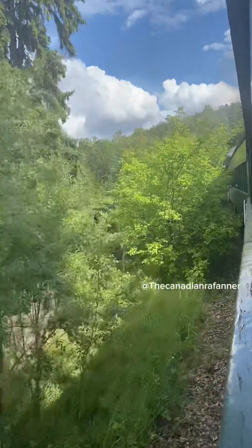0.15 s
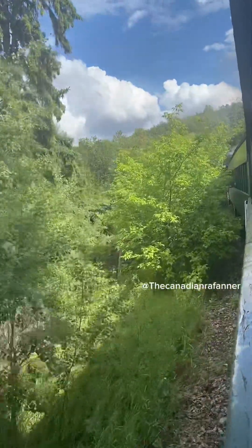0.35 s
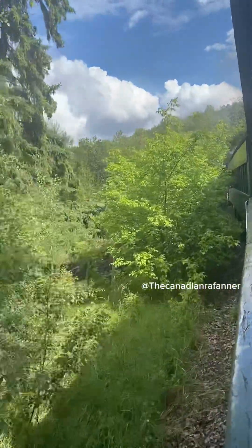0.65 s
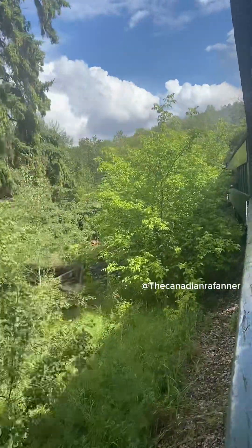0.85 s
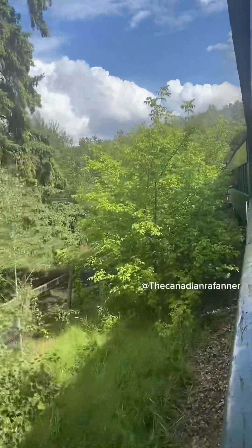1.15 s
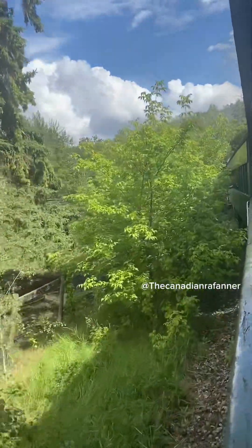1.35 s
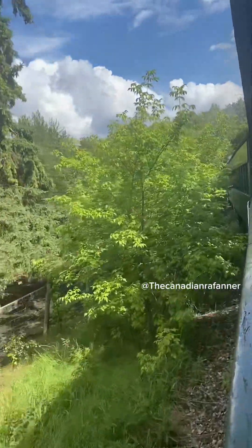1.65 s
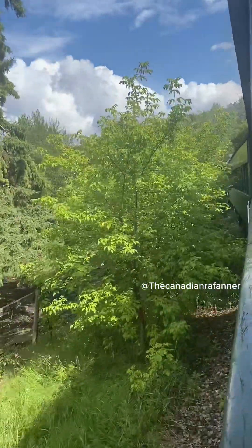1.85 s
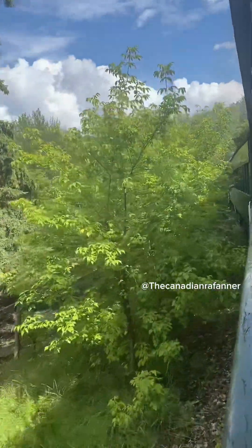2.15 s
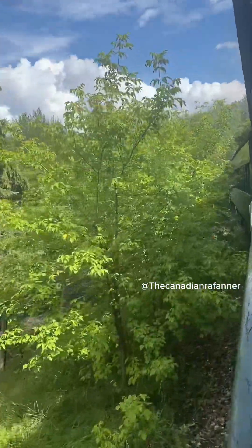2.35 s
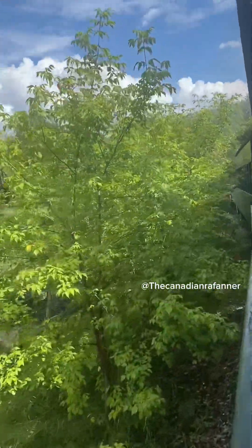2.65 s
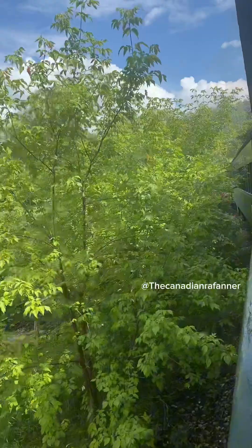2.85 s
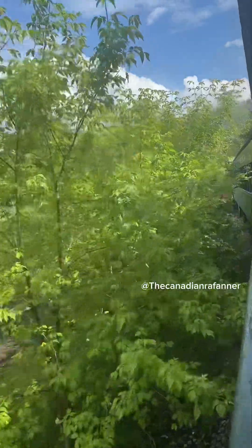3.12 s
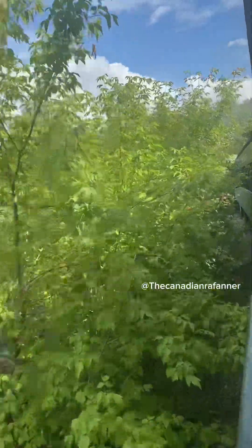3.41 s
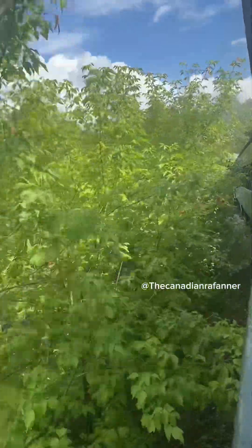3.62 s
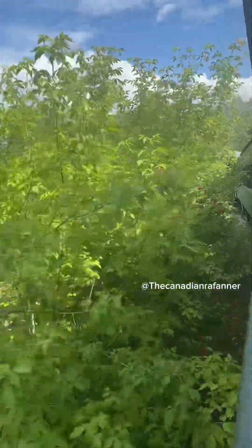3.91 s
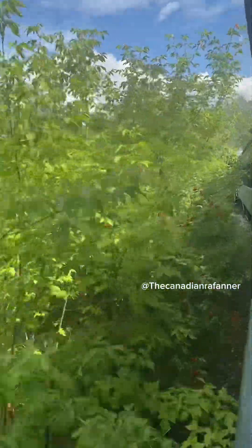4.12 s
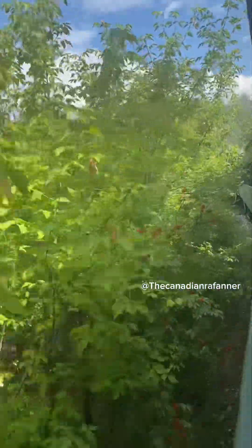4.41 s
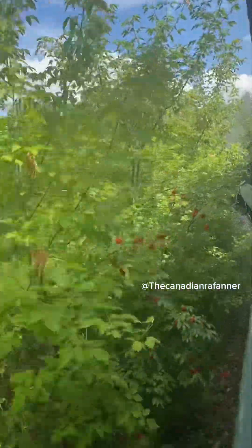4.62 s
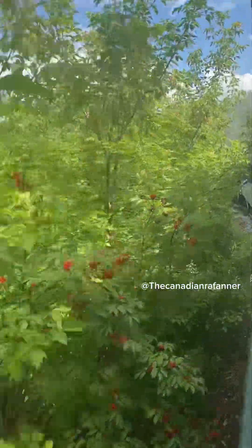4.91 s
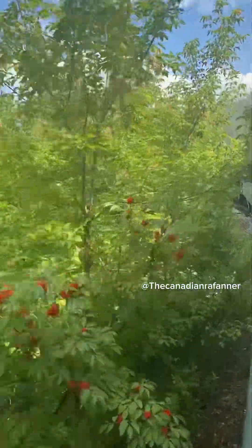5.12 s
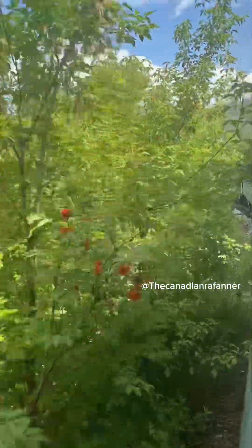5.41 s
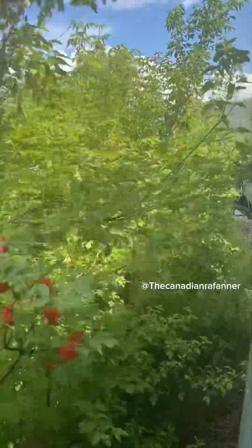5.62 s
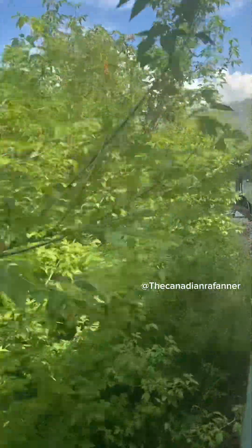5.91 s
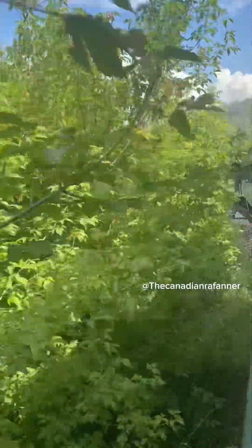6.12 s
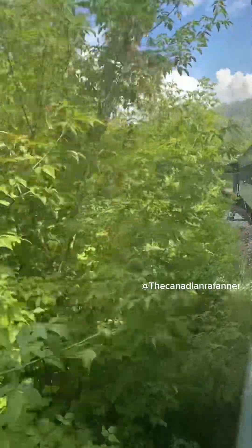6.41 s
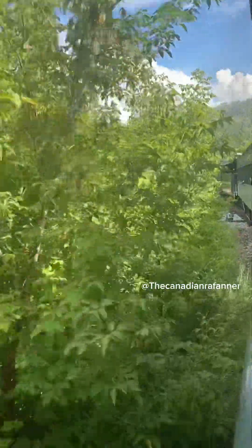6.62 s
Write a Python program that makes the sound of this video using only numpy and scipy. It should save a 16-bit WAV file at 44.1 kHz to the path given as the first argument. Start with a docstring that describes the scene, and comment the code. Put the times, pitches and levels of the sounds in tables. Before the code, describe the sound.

A steam engine puffs about three times a second ahead of a rolling carriage, over low booms, wheel grinding, joint knocks and brief squeals.

```python
"""A jolt booms through the carriage body, and at once a steam engine ahead puffs, three times a second.
Heard from an open carriage window: the puffs are bands of noise that swell fast and die, with echoes off trees.
Below, shaken body modes boom, coloured noise rolls with the wheels and damped low tones thud.
On a curve the flanges grind as patchy noise through wheel modes, with gliding noise squeals and purer squeaks.
Joints and couplings knock as chords of damped tones; a faint ringing rail and a thin hiss lie behind it all."""
import sys
import numpy as np
from scipy import signal
from scipy.fft import rfft, irfft
from scipy.io import wavfile
from scipy.ndimage import uniform_filter1d

SR = 44100
rng = np.random.default_rng(int(sys.argv[2]) if len(sys.argv) > 2 else 0)


def wav_record(signal):
    """Record a signal, one row per channel, as 16-bit PCM in the file named by sys.argv[1]."""
    frames = np.transpose(np.atleast_2d(signal))
    bounded = np.clip(frames, -1, 1)
    # unit amplitude maps onto the largest positive 16-bit level
    quanta = np.round(bounded * 32767).astype(np.int16)
    wavfile.write(sys.argv[1], SR, quanta)


N = 298116
T = np.arange(N) / SR  # time of each sample [s]
HZ = np.fft.rfftfreq(N, 1 / SR)  # frequency of each spectrum bin [Hz]


def amp(db):
    """Decibels to gain."""
    return 10 ** (np.asarray(db) / 20)


def evened(x):
    """Scales to rms 1."""
    return x / np.sqrt(np.mean(x ** 2) + 1e-20)


def read(f, value):
    """Reads a curve over frequency at every bin, joined on a log frequency axis."""
    return np.interp(np.log(HZ + 1), np.log(np.add(f, 1)), value)


def colour_gain(rows):
    """Turns a table of (frequency [Hz], density [dB per Hz]) into a gain for each bin."""
    return amp(read(*np.transpose(rows)))


def curves(rows):
    """Joins each level column of a (time [s], level [dB], ...) table over every sample."""
    s, *columns = np.transpose(rows)
    return [np.interp(T, s, column) for column in columns]


def smoothed_twice(x, size):
    """Two running means in a row leave only slow drift."""
    return uniform_filter1d(uniform_filter1d(x, size=size), size=size)


def noise(gain, patchy_db=None):
    """Two unrelated noises of one colour; patches of level drifting over time and pitch are shared by both."""
    x = irfft(rfft(rng.standard_normal((2, N))) * gain, N)
    if patchy_db is None:
        return evened(x)
    z = signal.stft(x, nperseg=512)[2]
    patches = rng.standard_normal(z.shape[:0:-1]).T
    patches = uniform_filter1d(patches, size=5, axis=0)  # across pitch
    patches = evened(uniform_filter1d(patches, size=8, axis=1))  # across time
    patchy = signal.istft(z * amp(patchy_db * patches), nperseg=512)[1]
    return evened(patchy[:, :N])


def peak(hz, width):
    """Gain of one steep resonance."""
    return 1 / (1 + ((HZ - hz) / (0.83 * width)) ** 2)


def hump(s, wide):
    """A smooth swell of power centred on s seconds, `wide` seconds between its 1/e points."""
    return np.exp(-((T - s) / (wide / 2)) ** 2)


def grain(depth_db, count, size):
    """A gain that jumps about, each clump lasting some `size` samples."""
    drift = evened(smoothed_twice(rng.standard_normal(count), size))
    return evened(amp(depth_db * np.clip(drift, -2.5, 2.5)))


SLIP_GRAIN_DB = 0.7  # unevenness of rubbing, also used in the short bursts


def band(hz, end_hz, width, length, skew=1.):
    """A grainy burst of noise in one gliding resonance; a skew below 1 brings its crest forward."""
    u = np.linspace(0, 1, int(length * SR))
    a, b = rng.standard_normal((2, 2, 20000))
    lowpass = signal.butter(2, width / 2, fs=SR, output="sos")
    slow = signal.sosfilt(lowpass, a + 1j * b)[:, -len(u):]  # past the filter's start
    glide = np.exp(2j * np.pi * np.cumsum(hz + (end_hz - hz) * u) / SR)
    x = (slow * glide).real
    x = evened(x * grain(SLIP_GRAIN_DB, count=20000, size=250)[:len(u)])
    return x * np.sin(np.pi * u ** skew) ** 0.69


def add(mix, s, sound):
    """Mixes a sound in at s seconds, cut off at the end of the mix."""
    part = mix[:, round(s * SR):][:, :sound.shape[1]]
    part += sound[:, :part.shape[1]]


# Thin hiss high above the wheels in pitch: (time [s], level [dB])
HISS_LEVEL = [(0, -49.5), (.4, -64), (1.04, -53.5), (1.5, -73), (1.92, -55), (2.45, -65), (2.96, -57),
              (3.5, -58.5), (4.3, -59.5), (4.45, -77), (4.7, -53.5), (5.35, -53), (5.9, -56.5), (6.23, -52),
              (6.48, -57.5), (6.76, -53)]
# Hiss colour: (frequency [Hz], relative density [dB per Hz])
HISS_COLOUR = [(4000, -12.5), (6000, 7.5), (8500, -0.5), (11000, -14.5), (13000, 3), (15000, -3)]


def hiss():
    """Smooth treble noise that swells and sinks slowly."""
    level_db, = curves(HISS_LEVEL)
    return amp(level_db) * noise(colour_gain(HISS_COLOUR), patchy_db=3.5)


TUG_DELAY_S = 0.042  # each piston stroke tugs the train just after its puff
RAIL_DB, RING_HALF_WIDTH_S = -44, 0.035  # steady ring; half-width of each swell


def rail():
    """Noise in two close narrow modes: the rail rings faintly all along and swells with each stroke."""
    power = amp(RAIL_DB) ** 2
    for s, *_, ring_db in PUFF_EVENTS:
        power = power + amp(ring_db) ** 2 * hump(s + TUG_DELAY_S, 2 * RING_HALF_WIDTH_S)
    modes = noise(peak(405.5, 35)) + amp(-5.5) * noise(peak(446.5, 12))
    return np.sqrt(power) * modes


# Track unevenness as the body feels it: (time [s], sway mode level [dB], floor mode level [dB])
TRACK_UNEVENNESS = [(0, -21.5, -27.5), (.28, -34.5, -37), (.45, -23, -27), (0.759, -25, -23.5),
                    (0.859, -44, -35.5), (1.1, -21, -27.5), (1.348, -27, -27.5), (1.6, -32.5, -39),
                    (1.95, -26.5, -21.5), (2.17, -31.5, -34.5), (2.35, -26.5, -26.5), (2.85, -34, -32.5),
                    (3.05, -25, -26.5), (3.4, -32.5, -32), (3.549, -24, -34.5), (3.95, -36.5, -31),
                    (4.45, -21.5, -25), (4.8, -33, -31.5), (5.1, -31.5, -33), (5.8, -30.5, -31.5),
                    (6.76, -29, -27.5)]
# Carriage body modes, sway then floor: (frequency [Hz], width [Hz])
BODY_MODES = [(37, 19), (76, 7.2)]
# Single jolts of the body: (time [s], length [s], sway mode level [dB], floor mode level [dB])
BODY_JOLTS = [(-0.001, 0.093, -14, -20), (0.116, 0.056, -26.5, -26), (0.548, 0.04, -29, -34),
              (1.196, 0.051, -26, -28), (1.712, 0.037, -25, -22.5), (2.45, 0.032, -28.5, -18.5),
              (2.502, 0.1, -18.5, -26.5), (2.63, 0.013, -22, -23), (2.796, 0.035, -28, -30),
              (3.111, 0.075, -15, -23), (3.742, 0.043, -21.5, -23.5), (3.847, 0.056, -21, -19.5),
              (4.34, 0.042, -21.5, -20), (4.954, 0.035, -18, -22), (5.042, 0.061, -25, -27),
              (5.332, 0.048, -31.5, -25), (5.65, 0.03, -23.5, -26), (5.951, 0.037, -25, -41),
              (6.282, 0.057, -21, -17.5), (6.528, 0.02, -21.5, -21.5)]


def boom():
    """Track unevenness and jolts shake two low body modes, each wavering in pitch more than in strength."""
    out = 0
    for k, (level_db, (hz, width)) in enumerate(zip(curves(TRACK_UNEVENNESS), BODY_MODES)):
        power = amp(level_db) ** 2
        for s, length, *jolt_db in BODY_JOLTS:
            power += amp(jolt_db[k]) ** 2 * hump(s, length)
        z = signal.hilbert(noise(peak(hz, width)))
        steadied = evened((z / abs(z) ** .6).real)  # flattens the envelope, keeps the phase
        out = out + np.sqrt(power) * steadied
    return out


# Wheels on rail between the strokes: (time [s], base level [dB])
ROLLING_LEVEL = [(0.0, -28.5), (0.21, -33.5), (0.45, -37), (0.62, -27.5), (0.77, -32.5), (1.05, -35),
                 (1.22, -31.5), (1.51, -33), (1.73, -38), (1.92, -31.5), (2.22, -34.5), (2.43, -29.5),
                 (2.58, -34), (2.79, -33.5), (2.94, -30.5), (3.26, -30), (3.69, -33.5), (4.59, -30.5),
                 (4.65, -35), (5.69, -31.5), (6.02, -34.5), (6.19, -32), (6.76, -34.5)]
# Rolling colour: (frequency [Hz], relative density [dB per Hz])
ROLLING_COLOUR = [(20, -59), (60, -50), (130, -50), (200, -52.5), (300, -54), (430, -58), (600, -63.5),
                  (800, -68), (1100, -71), (2000, -79.5), (4300, -96), (6500, -94), (8000, -95),
                  (15000, -104)]
# Bogie frame modes: (frequency [Hz], width [Hz], relative level [dB])
FRAME_MODES = [(150, 24, -7), (206.6, 20, -7), (294, 16, -11.5), (546, 34, -17.5), (768, 24, -17.5)]
TUG_HALF_WIDTH_S, TUG_DB = 0.063, -2  # swell of the rolling, its power relative to the base
LUMP_DB = 2.5  # unevenness of the rumble


def rolling():
    """Rough wheel on rough rail, coloured by the bogie frame, swelling with each tug."""
    level_db, = curves(ROLLING_LEVEL)
    tug = sum(hump(s + TUG_DELAY_S, 2 * TUG_HALF_WIDTH_S) for s, *_ in PUFF_EVENTS)
    tug = amp(TUG_DB) ** 2 * tug
    frame = sum(amp(db) * noise(peak(hz, width), patchy_db=4.0) for hz, width, db in FRAME_MODES)
    rumble = amp(3.5) * noise(colour_gain(ROLLING_COLOUR), patchy_db=2.0)
    return amp(level_db) * np.sqrt(1 + tug) * (rumble + frame) * grain(LUMP_DB, N, size=1200)


# Dull thuds of slack parts under the floor: (time [s], level before the soft onset [dB], frequency [Hz])
FLOOR_THUDS = [(0.091, -17, 122), (.382, -24.5, 361), (.735, -11.5, 338), (0.463, -11.5, 164.5),
               (0.615, -7.5, 199), (1.158, -16.5, 143.6), (1.29, -18, 127), (1.858, -16, 150),
               (2.368, -17, 412), (2.447, -9.5, 150), (2.663, -29.5, 132.5), (2.99, -22, 209),
               (3.088, -19.5, 162), (3.348, -19.5, 284), (3.469, -11.5, 108.5), (3.69, -10, 294),
               (3.8, -15, 194), (3.869, -15.5, 185), (3.946, -11.5, 197), (4.322, -18, 111),
               (4.863, -8, 150), (5.039, -10.5, 305.4), (5.849, -15.5, 125.3), (5.978, -14.5, 303),
               (6.37, -13, 195)]
THUD_T60_S = 0.091
SMALL_THUDS, SMALL_THUDS_DB, SMALL_THUDS_HZ = 24, -19.5, (104, 260)  # count, loudest, pitch range


def thuds():
    """Each thud is one low mode, pushed softly and dying fast; small ones fall at random."""
    out, t = np.zeros((2, N)), np.arange(10000) / SR
    low, high = SMALL_THUDS_HZ
    small = [(a * T[-1], SMALL_THUDS_DB - 6 * b, low * (high / low) ** c)
             for a, b, c in rng.random((SMALL_THUDS, 3))]
    events = FLOOR_THUDS + small
    for (s, db, hz), turn in zip(events, rng.random((len(events), 2, 1))):
        push = 1 - np.exp(-t / 0.0081)
        fall = amp(db - 60 * t / THUD_T60_S)
        add(out, s, fall * push * np.sin(2 * np.pi * (hz * t + turn)))
    return out


# Wheel rubbing on rail between the bouts: (time [s], flange scrape drive [dB], tread creep drive [dB])
RUBBING_LEVEL = [(0, -49, -37), (.3, -51.5, -56.5), (.9, -47.5, -45.5), (2, -51.5, -51.5),
                 (2.75, -47.5, -47), (3.4, -44.5, -42.5), (4.3, -47.5, -58.5), (5.1, -47, -43.5),
                 (6.76, -43, -39)]
# Bouts of grinding as a wheel leans on the rail:
# (time [s], rise [s], hold [s], t60 [s], flange scrape drive [dB], tread creep drive [dB])
GRINDING_BOUTS = [(1.001, 0.14, 0.18, 1.8, -40.5, -36.5), (1.824, 0.038, 0.017, 1, -46, -41),
                  (2.16, 0.05, 0.031, 0.58, -47, -41), (2.37, 0.17, 0.026, 0.53, -45, -40.5),
                  (2.805, 0.048, 0.16, 0.99, -34, -43), (3.764, 0.046, .04, 0.79, -48, -36.5),
                  (4.644, 0.034, 0.049, 1.3, -39, -35.5), (5.004, 0.12, 0.09, 0.49, -44, -35),
                  (5.315, 0.004, 0.16, 1.94, -34, -40), (5.742, .06, 0.02, 0.62, -61, -46),
                  (6.023, 0.071, 0.6, 1.6, -45, -42.5), (6.392, 0.038, 0.03, 0.94, -56, -43)]


def rubbing():
    """Strength of flange and tread rubbing: a slow level plus bouts that rise, hold and die."""
    power = amp(curves(RUBBING_LEVEL)) ** 2
    for s, rise, hold, t60, *db in GRINDING_BOUTS:
        after = np.clip(T - s - rise - hold, 0, None)
        shape = np.clip((T - s) / rise, 0, 1) * amp(-60 * after / t60)
        power = power + (amp(db)[:, None] * shape) ** 2
    return np.sqrt(power)


# Flange scrape colour: (frequency [Hz], relative density [dB per Hz])
SCRAPE_COLOUR = [(1800, -18.5), (2350, -1.5), (2850, -4.5), (4400, -7), (5200, -10.5), (6500, -10.5),
                 (10000, -19), (15000, -33)]
# Tread creep colour: (frequency [Hz], relative density [dB per Hz])
CREEP_COLOUR = [(600, -8.5), (1100, -11), (1600, -8), (2200, -10), (2800, -18.5), (15000, -53.5)]
# Wheel disc modes: (frequency [Hz], width [Hz], level relative to the rubbing drive [dB])
WHEEL_MODES = [(1142, 35, -18.5), (1555, 66, -19), (1642, 23, -18), (2060, 280, -21.5), (2280, 74, -17),
               (2764, 88, -12), (2950, 25, -15.5), (3350, 40, -29), (3626, 200, -13), (3990, 27, -15),
               (4320, 41, -15), (4460, 100, -21.5), (4650, 27, -20.5), (5490, 79, -18.5), (5840, 50, -23.5),
               (6170, 90, -35.5)]


def flanges():
    """Flange and tread rub separately; each hiss rings the wheel modes in its own range."""
    flange, tread = rubbing()
    out = flange * amp(-3) * noise(colour_gain(SCRAPE_COLOUR), patchy_db=1.5)
    out += tread * amp(-4) * noise(colour_gain(CREEP_COLOUR), patchy_db=2.2)
    for hz, width, db in WHEEL_MODES:
        rub = tread if hz < 2500 else flange
        out += amp(db) * rub * noise(peak(hz, width), patchy_db=1.9)
    return out * grain(SLIP_GRAIN_DB, N, size=400)


# Squeals, one wheel mode sticking and slipping:
# (time [s], length [s], start frequency [Hz], end frequency [Hz], width [Hz], level before the fades [dB])
WHEEL_SQUEALS = [(0.928, 0.1, 8740, 8600, 400, -45), (1.018, 0.28, 4200, 4230, 90, -52.5),
                 (1.121, 0.12, 1770, 1730, 200, -52), (2.245, 0.059, 9800, 9800, 300, -50),
                 (2.477, .08, 9400, 9600, 100, -49), (2.466, 0.096, 12200, 11800, 100, -50),
                 (2.544, 0.076, 2300, 2240, 700, -48), (2.811, 0.096, 1650, 1830, 194, -43),
                 (2.877, 0.19, 1605, 1804, 150, -38), (2.805, 0.22, 3000, 2730, 160, -47),
                 (2.83, 0.21, 3500, 4500, 500, -51), (3.767, 0.12, 1490, 1590, 300, -42),
                 (3.793, 0.16, 2950, 3100, 250, -50.5), (3.794, 0.17, 2300, 2000, 250, -48),
                 (3.919, 0.1, 2800, 2720, 160, -50), (4.71, 0.092, 8600, 8100, 600, -37),
                 (5.06, .09, 2020, 1985, 310, -46), (5.311, .11, 2750, 2950, 400, -35.5),
                 (5.314, .22, 3330, 3330, 300, -37), (5.36, .37, 2900, 2480, 360, -36.5),
                 (5.331, .075, 1585, 1595, 210, -38.5), (5.316, .33, 4550, 3850, 500, -39.5),
                 (6.28, 0.068, 2650, 2920, 400, -38), (6.439, 0.097, 1593, 1477, 200, -39),
                 (6.441, 0.13, 2056, 2240, 231.5, -40), (6.522, 0.087, 8050, 8000, 100, -50)]


def squeals():
    """Thin unsteady whistles: noise in a gliding resonance as a wheel mode sticks and slips."""
    out = np.zeros((2, N))
    for s, length, hz, end_hz, width, db in WHEEL_SQUEALS:
        add(out, s, amp(db) * band(hz, end_hz, width, length, skew=0.63))
    return out


# Squeaks, a wheel mode slipping cleanly:
# (time [s], length [s], frequency [Hz], rms level before the fades [dB], stutter depth [dB])
WHEEL_SQUEAKS = [(2.463, .11, 5670, -43, 5), (2.468, .085, 4100, -46, 2.5), (2.478, .045, 7370, -45, 3),
                 (4.728, .14, 4310, -45, 3.5), (4.74, .07, 2950, -47, 2), (6.52, .04, 4050, -40, 1.3),
                 (6.568, .027, 4045, -40.5, 1.3), (6.668, .055, 2935, -35, 3), (5.37, .05, 3310, -37, 2)]
SQUEAK_EDGE_S, SQUEAK_FADE_DB, SQUEAK_WOBBLE = .004, -10, .004  # fade over its length; pitch share


def squeaks():
    """Nearly pure tones of a cleanly slipping wheel mode that start at once, stutter and fade."""
    out = np.zeros((2, N))
    for s, length, hz, db, stutter_db in WHEEL_SQUEAKS:
        t = np.arange(0, length, 1 / SR)
        wobble = evened(uniform_filter1d(rng.standard_normal(8000), size=200))[:len(t)]
        cycles = np.cumsum(hz * (1 + SQUEAK_WOBBLE * wobble)) / SR
        tone = np.sin(2 * np.pi * cycles)[None]
        edges = np.minimum(np.minimum(t, length - t) / SQUEAK_EDGE_S, 1)
        fade = amp(db + 3 + SQUEAK_FADE_DB * t / length)  # +3 dB: rms to sine peak
        add(out, s, edges * fade * tone * grain(stutter_db, count=8000, size=120)[:len(t)])
    return out


# Knocks at rail joints: (time [s], level [dB], sharpness as a boost of modes above 600 Hz [dB])
JOINT_KNOCKS = [(0.174, -38, 0), (0.615, -25, 1), (1.532, -33, -7), (2.368, -25, -3), (2.422, -21.5, 0),
                (3.053, -34, 4), (3.187, -28, -12), (3.799, -28, -6), (4.16, -36, 0), (4.424, -28, -3),
                (5.043, -36, -12), (5.34, -33, 4), (6.237, -26, 1)]
# What a knock rings, frame below 600 Hz and rail end above:
# (nominal frequency [Hz], relative level [dB], t60 [s])
JOINT_MODES = [(209.6, -2, 0.2), (294, -3, 0.12), (410, 0, 0.25), (465, -1, .16), (570, -5, 0.08),
               (680, -5, .07), (780, -4, 0.12), (960, -5, 0.07), (1120, -5, .07), (1330, -11, 0.045),
               (1600, -16, .05), (1900, -17, .05), (2330, -17, .03), (2620, -18, .05), (2930, -20, .08)]
# Couplings rattle while each stroke takes up the slack: loudest blow, sharpness, time spread, blows a stroke
CLATTER_DB, CLATTER_SHARP_DB, CLATTER_S, CLATTERS = -42.5, 9, 0.054, 4


def knocks():
    """A blow starts all modes within 2 ms, the high ones more when sharp; small blows follow each stroke."""
    out, t = np.zeros((2, N)), np.arange(6000) / SR
    hz, mode_db, t60 = np.transpose(JOINT_MODES)[:, :, None]
    chance = rng.random((len(PUFF_EVENTS), CLATTERS, 2))
    small = [(s + a * CLATTER_S, CLATTER_DB - 8 * b, CLATTER_SHARP_DB)
             for (s, *_), row in zip(PUFF_EVENTS, chance) for a, b in row]
    events = JOINT_KNOCKS + small
    strays = rng.random((len(events), 2, 2, len(JOINT_MODES), 1))
    for (s, db, sharp_db), (detune, turn) in zip(events, strays):
        ring = amp(db + mode_db + sharp_db * (hz > 600) - 60 * t / t60)
        ring = ring * np.minimum(t / 0.002, 1)
        cycles = hz * (.96 + 0.08 * detune) * t + turn  # each mode strays up to 4 % in pitch
        add(out, s, (ring * np.sin(2 * np.pi * cycles)).sum(axis=1))
    return out


# Exhaust puffs: (time [s], level at 800-6000 Hz before tilt [dB], bass thump [dB],
# treble tilt [dB per band], t60 of the lowest band [s], first echo colour off the nearest trees [Hz],
# its level relative to the puff [dB], second echo colour [Hz], its level [dB], rail ringing level [dB])
PUFF_EVENTS = [(0.06, -35, -8.5, -0.5, 0.51, 897, -4.5, 1830, -9, -42),
               (0.357, -30.5, -12, -2.5, 0.71, 757, -8.5, 1830, -9, -33.5),
               (0.713, -27.5, -8, -3, 0.27, 835, -13, 1322, -15, -48),
               (1.028, -32.5, -5, -2, 0.42, 1060, -9, 1863, -8.5, -34),
               (1.384, -31, -4, -2.5, 0.31, 955, -8, 2550, -14, -41),
               (1.682, -29.5, -5, -2, 0.52, 1274, -16, 1910, -14, -34.5),
               (2.024, -29.5, -5.5, -2, 0.53, 1706, -9, 2720, -19, -46),
               (2.345, -32.5, -3, -0.5, 1, 792, -7, 1843, -5, -37),
               (2.691, -25, -9, -2.5, 0.42, 1116, -12, 1873, -12, -54),
               (3.023, -26, -9, -5.5, 0.19, 781, -12, 1806, -13.5, -41),
               (3.345, -36, -6, 0.5, 0.53, 1085, -7, 3670, -11, -36),
               (3.661, -29, -7, -0.5, 0.3, 1255, -8.5, 997, -16, -32),
               (4.015, -32, -3, 0.4, 0.22, 820, -13, 3140, -12, -29.5),
               (4.313, -29.5, -5.5, -0.66, 0.43, 1254, -8, 2970, -9.5, -52),
               (4.652, -29.5, -6, -2.5, 1, 1048, -12.5, 3170, -12, -46),
               (4.974, -29.5, -7, -0.2, 0.32, 1270, -15, 2860, -4.5, -34.5),
               (5.318, -35, -5.5, 1.5, 1, 1645, -4, 3110, -6, -35),
               (5.634, -26, -11, -1, 0.33, 1324, -26, 2750, -11, -33.5),
               (5.974, -28.5, -7.5, -2, 0.71, 1222, -23, 2790, -10.5, -44),
               (6.29, -31, -2.5, 0.6, 0.35, 988, -11.5, 2840, -5.5, -31),
               (6.64, -29, -14.5, 0.85, 0.27, 2144, -7, 3014, -21, -37)]
# Steam colour: (frequency [Hz], relative density [dB per Hz])
PUFF_COLOUR = [(80, -62.5), (200, -52), (300, -47), (430, -54.5), (600, -57.5), (1100, -65.5),
               (2000, -67.5), (2700, -69.5), (4300, -71.5), (6500, -81), (10000, -82.5), (15000, -104)]
PUFF_LEAD_S, PUFF_RISE_S, PUFF_HOLD_S = 0.018, 0.039, 0.019  # the swell starts ahead of the listed time
TREBLE_HASTE = 0.15  # the treble dies faster by this share per band
PUFF_GRAIN_DB = 0.77  # unevenness of steam
ECHO_WIDTH, ECHO_S = 0.17, .08  # width as a share of its pitch


def exhaust():
    """Each puff of steam swells fast and dies; trees along the line throw back a longer tail."""
    colour = colour_gain(PUFF_COLOUR)
    edges_hz = np.array([0, 850, 1700, 3500, 30000])
    reference = colour[(HZ > 800) & (HZ < 6000)]
    whole = np.sqrt(np.mean(reference ** 2) * 5200 / (SR / 2))  # strength at 800-6000 Hz
    out = np.zeros((2, N))
    for k in range(4):
        low_cut = 1 + (edges_hz[k] / (HZ + 1)) ** 6
        high_cut = 1 + (HZ / edges_hz[k + 1]) ** 6
        shape = colour / low_cut / high_cut
        power = np.zeros(N)
        for s, db, thump_db, tilt_db, t60, *_ in PUFF_EVENTS:
            u = np.clip(T - s + PUFF_LEAD_S, 0, None)
            swell = np.sin(np.pi / 2 * np.clip(u / PUFF_RISE_S, 0, 1)) ** 1.5
            after = np.clip(u - PUFF_RISE_S - PUFF_HOLD_S, 0, None)
            puff_fall = amp(-60 * after * (1 + TREBLE_HASTE * k) / t60) ** 2
            tree_tail = amp(-16.0 - 60 * after / 0.87) ** 2
            band_db = thump_db if k == 0 else tilt_db * k
            power += (swell * amp(db + band_db)) ** 2 * (puff_fall + tree_tail)
        steam = noise(shape, patchy_db=2.0) * grain(PUFF_GRAIN_DB, N, size=120)
        out += np.sqrt(power * np.mean(shape ** 2)) / whole * steam
    for s, db, _, _, _, *echoes, _ in PUFF_EVENTS:
        for hz, echo_db in np.reshape(echoes, (2, 2)):
            add(out, s, amp(db + echo_db) * band(hz, hz, ECHO_WIDTH * hz, ECHO_S, skew=.75))
    return out


# Stereo image by pitch, opposite phase at 8.6-11.6 kHz:
# (frequency [Hz], likeness from ahead [0-1], right lead from ahead [rad],
# likeness from below [0-1], right lead from below [rad], left over right [dB])
STEREO_IMAGE = [(30, .995, 0.01, .995, 0.01, 0), (55, .98, 0.01, .98, 0.01, 0),
                (85, .8, 0.01, .8, 0.01, -.5), (130, .3, .1, .3, -1.2, 0), (300, .6, .2, .45, -2.3, 1),
                (700, .75, .8, .4, -3, .5), (1100, .85, .4, .4, .6, -1.5), (1900, .93, -.1, .75, -.2, -1.2),
                (3400, .72, -.6, .5, -.5, -4.5), (5200, .55, -1.2, .42, -1.5, -1),
                (6500, .75, -1.8, .7, -1.9, .5), (7600, .9, -2.7, .9, -2.8, 0),
                (8600, 1, -np.pi, 1, -np.pi, 0), (11600, 1, -np.pi, 1, -np.pi, 0),
                (12500, .8, -3.3, .75, -3.4, 0), (15000, .3, -3.9, .35, -4.4, 0)]


def stereo_image(pair, same, lead):
    """Sets likeness, phase and level of right against left by pitch; unlike parts stay unrelated noise."""
    f, *columns = np.transpose(STEREO_IMAGE)
    likeness = np.clip(read(f, columns[same]), 0, 1)
    turn = np.exp(1j * read(f, columns[lead]))
    half = amp(read(f, columns[-1]) / 2)  # half the level difference goes to each side
    a, b = rfft(pair)
    right = likeness * turn * a + np.sqrt(1 - likeness ** 2) * b
    return irfft([a * half, right / half], N)


def scene():
    """Engine, flanges, knocks, hiss and rail come from ahead; boom, rolling and thuds from below."""
    below = boom() + rolling() + thuds()
    ahead = hiss() + rail() + flanges() + squeals() + squeaks() + knocks() + exhaust()
    return stereo_image(ahead, same=0, lead=1) + stereo_image(below, same=2, lead=3)


EDGE_HZ = 15500


def record(dry):
    """The band limit: a steep low-pass takes away the top treble."""
    lowpass = signal.firwin(511, EDGE_HZ, window=("kaiser", 9), fs=SR)
    return signal.oaconvolve(dry, lowpass[None], "same")


dry = scene()
out = record(dry)
wav_record(out)
```